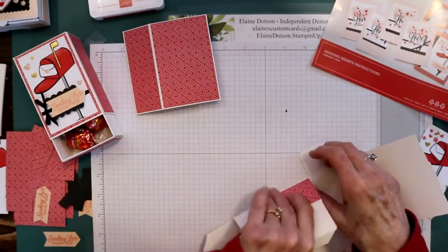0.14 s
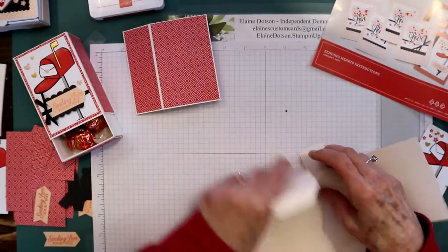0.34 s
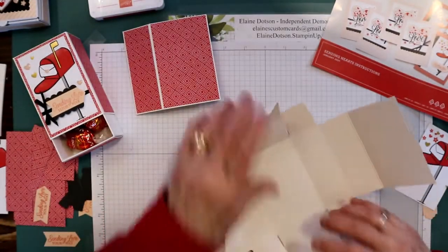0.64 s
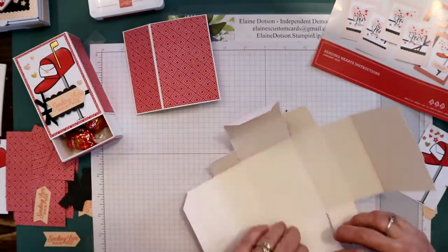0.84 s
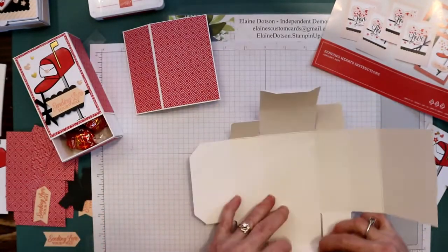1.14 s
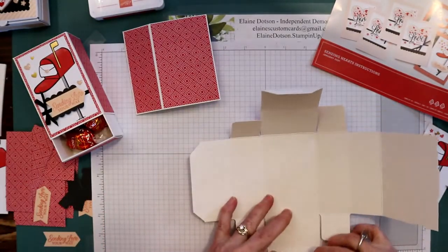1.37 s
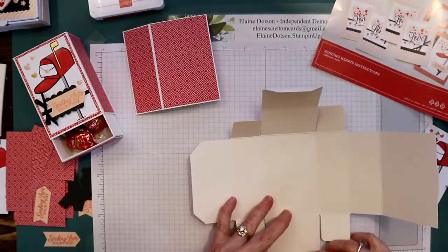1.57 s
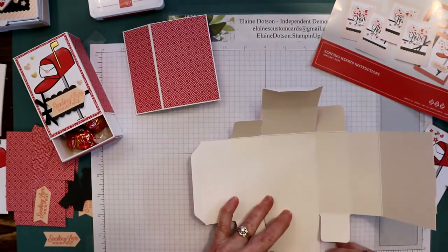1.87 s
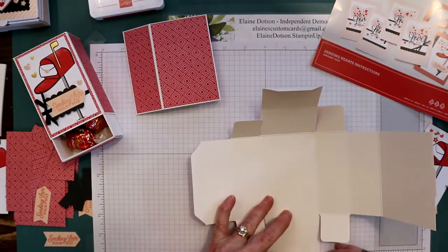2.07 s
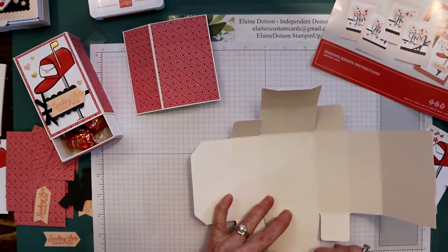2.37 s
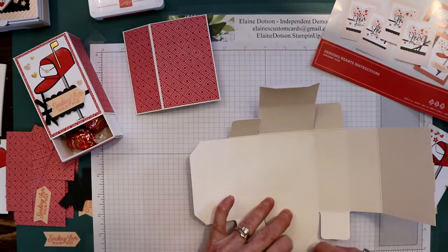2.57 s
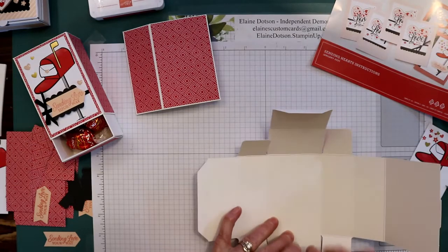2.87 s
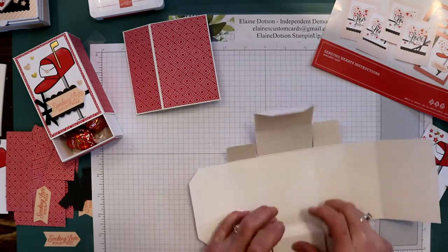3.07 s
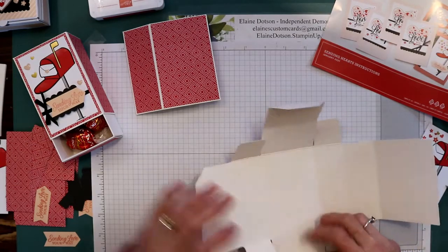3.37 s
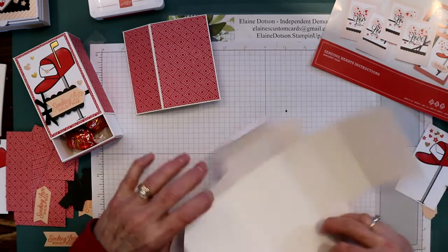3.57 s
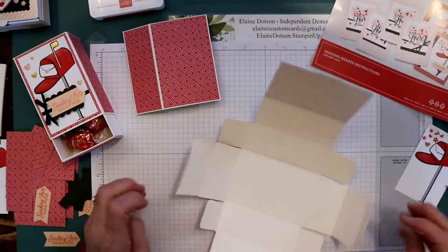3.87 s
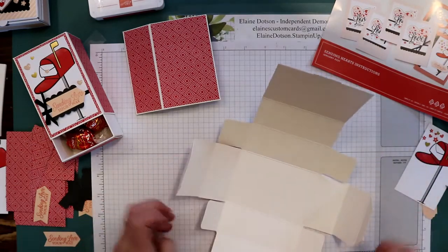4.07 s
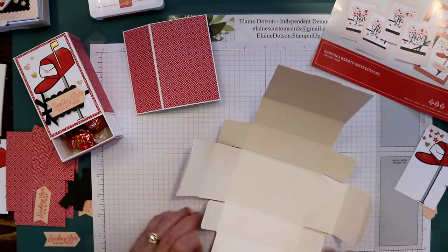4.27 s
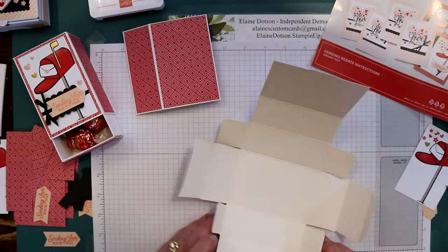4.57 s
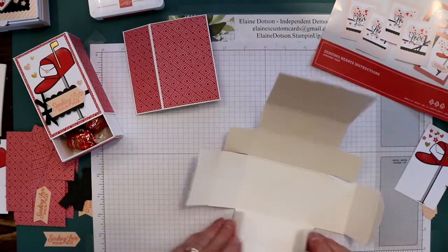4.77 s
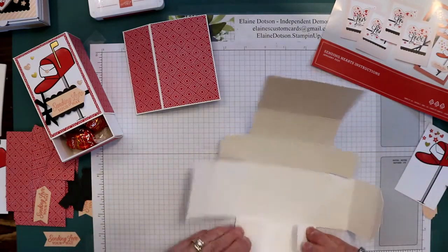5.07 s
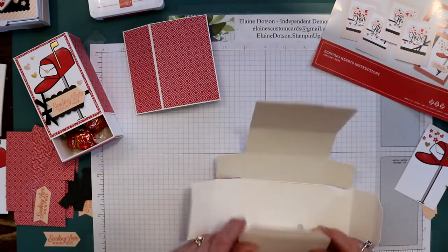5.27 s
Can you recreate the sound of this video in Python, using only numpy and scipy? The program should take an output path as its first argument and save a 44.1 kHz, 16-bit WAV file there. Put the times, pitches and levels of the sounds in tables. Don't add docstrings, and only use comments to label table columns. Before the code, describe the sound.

A stiff card blank is handled on a desk mat in a small, quiet, fairly dry room. It opens with a brisk papery rustle, two light snaps and a low desk thump within 0.1 s, then softer rustling and small finger taps to 0.6 s. From 0.8 to 1.35 s the card slides and flips with hiss, taps, another low thump and a soft flap snap. From 1.4 to 2.5 s it is mostly quiet: dull desk bumps, faint brushes, a small tap near 1.95. At 2.6 to 3.1 s scraping and rustling swell, with clustered crease cracks near 2.7, flap snaps near 2.95 and the loudest sharp snap at 3.07. More snaps and scrapes follow at 3.27, 3.45 and, strongly, 3.6. A thin bright click comes at 4.16, then near-quiet, light taps at 4.8 and gentle rustling and taps from 5.0 to the end. Close, centred pickup with faint airy hiss.

```python
import sys
import numpy as np
from scipy import signal
from scipy.fft import rfft, irfft, next_fast_len
from scipy.io import wavfile
from scipy.ndimage import uniform_filter1d

SR = 44100
rng = np.random.default_rng(int(sys.argv[2]) if len(sys.argv) > 2 else 0)


def inscribe(sig):
    pcm = np.round(np.clip(np.atleast_2d(sig).T, -1, 1) * 32767)
    wavfile.write(sys.argv[1], SR, pcm.astype(np.int16))


def boost_factor(decibels):
    exponent = np.asarray(decibels, float) / 20
    return 10 ** exponent


N = 239446
EDGE_HZ, HISS_EDGE_HZ = 16300, 15750

# (time [s], effort level [dB], bending panel pitch [Hz])
HANDS = [(0.0, -58.5, 800), (.2, -60.5, 900), (.34, -65, 700), (.52, -61.5, 970), (.73, -78.5, 706),
         (.86, -64, 810), (1.16, -62.5, 960), (1.3, -68.5, 1100), (1.8, -69.5, 890), (2.15, -74, 700),
         (2.55, -68.5, 597), (3.2, -65.5, 1300), (3.8, -66, 905), (4.1, -73.5, 700), (4.7, -72.5, 800),
         (4.97, -64, 750), (5.05, -59.5, 920), (5.43, -62, 890)]


def evened(x):
    return x / np.sqrt(np.mean(x ** 2) + 1e-20)


def read(points, hz):
    f, value = np.transpose(points)
    return np.interp(np.log(hz + 1), np.log(f + 1), value)


def curves(rows):
    s, *columns = np.transpose(rows)
    return [np.interp(np.arange(N) / SR, s, column) for column in columns]


def colour(x, points):
    size = next_fast_len(len(x))
    gain = boost_factor(read(points, np.fft.rfftfreq(size, 1 / SR)))
    return evened(irfft(rfft(x, size) * gain, size)[:len(x)])


def band(x, low_hz, high_hz):
    x = signal.sosfilt(signal.butter(2, low_hz, "high", fs=SR, output="sos"), x)
    lowpass = signal.firwin(401, high_hz, window=("kaiser", 9), fs=SR)
    return signal.oaconvolve(x, lowpass, "same")


def resonate(x, hz, width_hz):
    turn = np.exp(2j * np.pi * np.cumsum(hz * np.ones(len(x))) / SR)
    r = np.exp(-np.pi * width_hz / SR)
    return 2 * (turn * signal.lfilter([1 - r], [1, -r], x / turn + 1e-18)).real


def resonate_twice(x, hz, width_hz):
    return evened(resonate(resonate(x, hz, width_hz), hz, width_hz))


def grains(per_s, spread_db):
    chance, sign, size = rng.random((N, 3)).T
    size_db = spread_db * np.minimum(-np.log(size + 1e-9), 5)
    return (chance < per_s / SR) * np.sign(sign - .5) * boost_factor(size_db)


def flicker(size, depth_db):
    smooth = uniform_filter1d(uniform_filter1d(rng.standard_normal(N), size), size)
    return boost_factor(depth_db * evened(smooth))


def stroke(length_s, rising):
    return np.interp(np.arange(0, 1, 1 / (length_s * SR)), [0, np.clip(rising, .02, .9), 1], [0, 1, 0])


def strokes(rows):
    out = np.zeros(N)
    for s, length_s, db, rising in rows:
        shape = stroke(length_s, rising)
        out[round(s * SR):][:len(shape)] += boost_factor(db) * shape
    return out


def room_air():
    # (frequency [Hz], level [dB per Hz])
    air_spectrum = [(15, -13), (25, 10.5), (45, -2.5), (110, -2), (470, -6.5), (1200, -11), (2500, -15.5),
                    (6000, -17.5), (11000, -15), (16000, -14.5)]
    return band(boost_factor(-65) * colour(rng.standard_normal(N), air_spectrum), 13, HISS_EDGE_HZ)


def side_air():
    # (frequency [Hz], level [dB per Hz])
    side_spectrum = [(15, -43), (25, -11), (64, -19), (227, -6.5), (341, -4), (446, -5), (650, -5.5),
                     (1270, -8.5), (15600, -9)]
    return band(boost_factor(-71) * colour(rng.standard_normal(N), side_spectrum), 13, HISS_EDGE_HZ)


def room(x):
    # (frequency [Hz], t60 [s])
    decay = [(200, 0.1), (700, 0.18), (2500, 0.2), (6000, 0.16), (14000, 0.19)]
    taps, size = np.zeros(SR // 2), 16
    at = np.arange(140, len(taps) - size, size)
    taps[at + rng.integers(0, size, len(at))] = rng.choice([-1., 1.], len(at))
    hz, t, z = signal.stft(taps, SR, nperseg=128)
    tail = signal.istft(z * boost_factor(-60 * t / read(decay, hz)[:, None]), SR, nperseg=128)[1]
    return signal.fftconvolve(x, tail / np.linalg.norm(tail))[:N]


def desk():
    # (time [s], wobble level [dB], wobble frequency [Hz], panel hum level [dB])
    jolts = [
        (.078, -41, 79, -51),
        (.983, -42.5, 74.5, -50),
        (1.425, -61, 78, -56),
        (2.723, -45, 78, -48),
        (3.005, -51, 90, -58),
        (3.373, -46, 77.5, -49),
        (3.603, -47, 78, -41.5),
        (4.773, -59, 80.4, -64),
    ]
    # (time of most weight [s], wobble level [dB], wobble frequency [Hz], panel hum level [dB])
    leans = [(.05, -60, 88, -70), (.17, -58, 85, -59), (.236, -56, 77, -77), (.304, -58, 87, -66),
             (.39, -67, 72, -63), (.62, -65, 67, -79), (.844, -69, 92, -71), (.948, -53, 101, -66),
             (1.157, -62, 74.5, -84), (1.281, -65, 75, -78), (1.481, -53, 80.4, -54),
             (1.559, -62, 86, -55.5), (1.677, -58, 78, -57.5), (1.828, -69, 75.6, -65),
             (2.0, -66.5, 76.4, -72), (2.2, -69, 78, -69), (2.444, -58.5, 73, -51),
             (2.622, -53.5, 83, -50.5), (2.959, -49.5, 81, -58), (3.065, -43.5, 91, -42.5),
             (3.283, -58.5, 80, -75), (3.531, -59, 71.5, -78), (3.753, -60.5, 78, -73),
             (4.317, -69.5, 79, -89), (4.62, -75, 76.4, -73), (4.83, -56.5, 79.4, -60),
             (5.117, -63, 73.5, -70), (5.217, -59, 75, -64), (5.373, -57, 72, -72)]
    shake = evened(resonate(resonate(rng.standard_normal(N), 75.6, 43), 77.0, 45))
    hum = np.sqrt(2) * np.sin(2 * np.pi * np.cumsum(170 * flicker(size=700, depth_db=1.42)) / SR)
    buzz = resonate_twice(rng.standard_normal(N), 121, 107)
    panel = 0.28 * hum + 0.55 * buzz
    t = np.arange(N) / SR
    effort_db = curves(HANDS)[0]
    out = boost_factor(effort_db) * (boost_factor(-13.5) * shake + boost_factor(-11) * panel)
    for rows, rise, hold_s, fall in (jolts, 4800, 0.035, 380), (leans, 266, 0.0049, 233):
        for s, wobble_db, hz, hum_db in rows:
            near = slice(max(round((s - .2) * SR), 0), round((s + .3) * SR))
            since = t[near] - s
            weight = boost_factor(np.minimum(rise * since, 0) - fall * np.maximum(since - hold_s, 0))
            wobble = 1.27 * np.sin(2 * np.pi * hz * since) + .4 * shake[near]
            out[near] += weight * (boost_factor(wobble_db) * wobble + boost_factor(hum_db) * panel[near])
    return out


def rings():
    # (time [s], length [s], peak level [dB], frequency [Hz], share of length rising)
    bursts = [(0.363, 0.0069, -50.5, 696, 0.45), (0.856, 0.063, -55, 367, 0.1),
              (0.86, 0.035, -55.5, 1556, 0.086), (1.47, 0.035, -45, 165, 0.99),
              (1.545, 0.027, -42, 173, 0.43), (1.573, 0.035, -50, 165, 0.53),
              (1.962, 0.011, -47, 430, 0.46), (2.974, 0.0073, -36.5, 1785, 0.41),
              (3.269, 0.054, -54.5, 1237, 0.075), (4.1646, 0.0049, -23.5, 4270, 0.29),
              (4.179, 0.0065, -30.5, 3690, 0.57), (4.184, 0.0051, -51, 3500, .3)]
    out = np.zeros(N)
    for s, length_s, db, hz, rising in bursts:
        swell = np.sin(np.pi / 2 * stroke(length_s, rising)) ** 2
        at, t = round(s * SR), np.arange(len(swell)) / SR
        out[at:at + len(t)] += boost_factor(db) * swell * np.sin(2 * np.pi * hz * t)
    return out


def scrapes():
    # (time [s], length [s], level [dB], centre [Hz], share of length rising)
    broad = [(0.06, 0.16, -49, 6640, 0.089), (0.365, 0.27, -56, 7000, 0.12),
             (1.338, 0.13, -55.5, 4640, 0.59), (1.351, 0.067, -60, 1110, 0.82),
             (1.635, 0.048, -56, 990, 0.17), (1.944, 0.057, -54.5, 940, 0.34),
             (2.38, 0.11, -55, 4060, 0.45), (2.588, 0.088, -55.5, 6100, 0.3), (2.7, 0.078, -47, 790, .45),
             (2.92, 0.12, -47, 760, 0.4), (3.082, 0.056, -58, 2040, 0.13), (3.243, 0.052, -47, 3240, .45),
             (3.427, 0.062, -44, 1690, 0.3), (3.609, 0.044, -44, 550, 0.074),
             (4.164, 0.039, -47.5, 6500, 0.12), (5.283, 0.025, -58, 750, 0.37),
             (5.067, 0.17, -52.5, 6890, 0.3)]
    # (time [s], length [s], level [dB], centre [Hz], share of length rising)
    narrow = [
        (1.204, 0.083, -52, 1090, 0.11),
        (1.941, 0.05, -51.5, 5370, 0.39),
        (2.958, 0.053, -44, 5130, 0.55),
        (3.24, 0.056, -45, 1200, 0.3),
        (3.689, 0.048, -54, 2600, 0.27),
        (4.16, 0.067, -48, 3800, 0.075),
        (4.165, 0.024, -51.5, 620, 0.29),
        (2.298, 0.034, -62, 3200, 0.39),
        (4.76, 0.21, -67.5, 1980, 0.11),
        (5.1, .3, -66, 2090, 0.46),
    ]
    out, slips = np.zeros(N), grains(6000, 1.24) * flicker(size=150, depth_db=1.0)
    for rows, width_over_centre in (broad, 1.75), (narrow, 0.7):
        for s, length_s, db, hz, rising in rows:
            shape = stroke(length_s, rising)
            at = round(s * SR)
            scrape = resonate_twice(slips[at:at + len(shape)], hz, width_over_centre * hz)
            out[at:at + len(shape)] += boost_factor(db) * shape * scrape
    return out


def card_moving():
    # (frequency [Hz], level [dB per Hz])
    hiss_spectrum = [(710, -30), (1200, -27), (1270, -8), (1600, -3.5), (2800, -2.5), (3120, 0.5),
                     (8020, -2.5), (15600, -6.5)]
    # (frequency [Hz], level [dB per Hz])
    rustle_spectrum = [(120, -45), (200, 6.5), (682, -4), (866, -5), (1250, -6), (1490, -4.5), (1800, -3.5),
                       (2320, -4), (9000, -14), (11700, -66), (19800, -120)]
    # (time [s], length [s], hiss level [dB], share of length rising)
    slides = [(.05, 0.13, -56, 0.37), (.88, 0.21, -55.5, 0.45), (1.08, 0.16, -68, 0.87),
              (1.6, 0.16, -79, 0.54), (1.92, 0.13, -69.5, 0.44), (2.2, 0.27, -75, 0.35),
              (2.59, 0.22, -50, 0.36), (2.88, 0.32, -53.5, 0.33), (3.15, 0.43, -64.5, 0.28),
              (3.4, 0.27, -60, 0.38), (3.56, 0.24, -59.5, 0.33), (4.95, 0.26, -69, 0.46)]
    # (time [s], length [s], rustle level [dB], share of length rising)
    flexes = [
        (.05, 0.11, -55, 0.56),
        (.8, 0.11, -63.5, 0.54),
        (.96, .1, -67.5, 0.4),
        (2.6, 0.24, -59.5, 0.54),
        (2.9, 0.18, -62, 0.75),
        (3.14, 0.15, -68.5, 0.66),
        (3.54, 0.17, -56, 1),
        (4.25, 0.19, -74, 0.41),
        (4.7, .2, -65, 0.45),
    ]
    effort_db, panel_hz = curves(HANDS)
    hiss = colour(grains(9000, 1.4), hiss_spectrum) * flicker(size=300, depth_db=1.8)
    slips = colour(grains(1800, 2.5), rustle_spectrum) * flicker(size=400, depth_db=1.0)
    panel = evened(resonate(slips, panel_hz * flicker(size=3000, depth_db=2.0), 220))
    rustle = evened(slips + 0.45 * panel)
    sliding = boost_factor(-69.5 + 0.95 * (effort_db + 63.5)) + boost_factor(-76) + strokes(slides)
    bending = boost_factor(effort_db) + strokes(flexes)
    return sliding * hiss + bending * rustle


def snap(t, rattle, card_hz, edge_hz, edge_db, t60_s):
    rise = 1 - np.exp(-t / (0.033 * t60_s))
    card = np.sin(2 * np.pi * card_hz * t) + .5 * evened(resonate(rattle, card_hz, 360))
    edge = np.sin(2 * np.pi * edge_hz * t) + .5 * resonate_twice(rattle, edge_hz, 2200)
    tick = 0.5 * resonate_twice(rattle, 3900, 7000) * boost_factor(-60 * t / 0.01)
    card *= boost_factor(-60 * t / t60_s)
    edge *= boost_factor(-60 * t / (0.63 * t60_s))
    share = min(boost_factor(edge_db), .97)
    return rise * (np.sqrt(1 - share ** 2) * card + share * (edge + tick))


def snaps():
    # (time [s], peak level [dB], card ring [Hz], edge ring [Hz], edge ring level [dB])
    flap_snaps = [(0.011, -33, 695, 2200, -7), (0.073, -30, 563, 4600, -9.5),
                  (1.196, -34, 1240, 1980, -3.5), (2.702, -35, 587, 5300, -2.5),
                  (2.723, -30.5, 1060, 2380, -8), (2.749, -35, 980, 4270, -3),
                  (2.921, -40, 1250, 4070, -10), (2.937, -31, 480, 3180, -2.5), (2.974, -29, 681, 1960, 1),
                  (2.997, -31.5, 695, 1750, -6), (3.07, -15.5, 906, 2420, 5), (3.269, -30, 1190, 1840, 3),
                  (3.424, -33, 650, 2220, -0.5), (3.456, -30.5, 1014, 2240, -9),
                  (3.604, -20.5, 680, 2130, -7), (3.617, -26, 734, 2550, -1)]
    # (time [s], peak level [dB], card ring [Hz], edge ring [Hz], edge ring level [dB])
    cracks = [
        (2.7255, -22.5, 420, 6960, -1),
        (3.0701, -16.5, 1650, 5170, -2),
        (3.074, -32, 1640, 7660, 3),
        (3.606, -21, 363, 2470, -4.5),
        (4.1627, -29, 2440, 8530, -1.5),
        (1.1964, -32.5, 534, 4000, -6),
        (1.3345, -45.5, 910, 3500, -1),
        (2.732, -29.5, 960, 2390, 1),
        (3.4565, -32, 450, 5930, 0),
    ]
    # (time [s], peak level [dB], card ring [Hz], edge ring [Hz], edge ring level [dB])
    finger_taps = [(0.264, -44.5, 605, 3020, -3), (0.305, -50, 610, 1670, -3),
                   (0.462, -46.5, 770, 4480, -13), (0.519, -41.5, 810, 3060, -12),
                   (0.824, -42.5, 557, 1860, -2), (0.855, -37, 350, 3300, -3.5),
                   (0.982, -42.5, 466, 4210, 5), (1.035, -36.5, 735, 2130, -3.5),
                   (1.081, -42, 890, 4230, 1), (1.956, -41, 900, 3560, -3), (2.606, -41.5, 433, 2050, 0),
                   (3.374, -48.5, 1420, 3860, -4.5), (4.303, -51, 549, 2560, 0),
                   (4.771, -39.5, 683, 1800, -1), (4.814, -41.5, 750, 2310, -5),
                   (5.082, -36, 623, 2160, -3.5), (5.097, -39, 984, 2400, -6), (5.189, -45, 473, 2360, -8),
                   (5.283, -38.5, 760, 2130, -10), (5.296, -38.5, 594, 1990, -28),
                   (5.336, -41, 1080, 2130, -23)]
    out, t = np.zeros(N + 3000), np.arange(3000) / SR
    for rows, t60_s in (flap_snaps, 0.018), (cracks, 0.012), (finger_taps, 0.016):
        for s, db, card_hz, edge_hz, edge_db in rows:
            at = round((s + .0009) * SR)
            rattle = rng.standard_normal(len(t))
            out[at:at + len(t)] += boost_factor(db) * snap(t, rattle, card_hz, edge_hz, edge_db, t60_s)
    return out[:N]


def scene():
    clicks = band(snaps() + rings(), 70, EDGE_HZ)
    moving = band(card_moving() + scrapes(), 270, EDGE_HZ)
    reflected = boost_factor(-6) * room(clicks + 0.5 * moving)
    steady = band(moving + reflected + desk(), 43, HISS_EDGE_HZ)
    mid = clicks + steady + room_air()
    side = side_air()
    return np.array([mid + side, mid - side])


def roll_off(x):
    return signal.sosfilt(signal.butter(12, 16650, fs=SR, output="sos"), x)


def record(dry):
    mix = dry + .0005
    return roll_off(mix)


dry = scene()
out = record(dry)
inscribe(out)
```